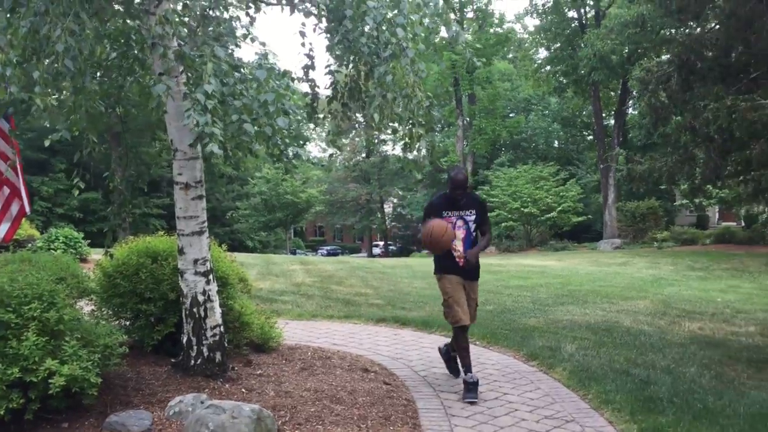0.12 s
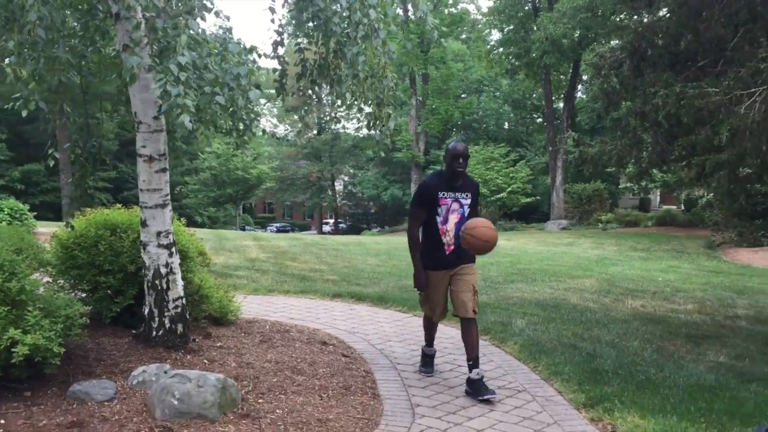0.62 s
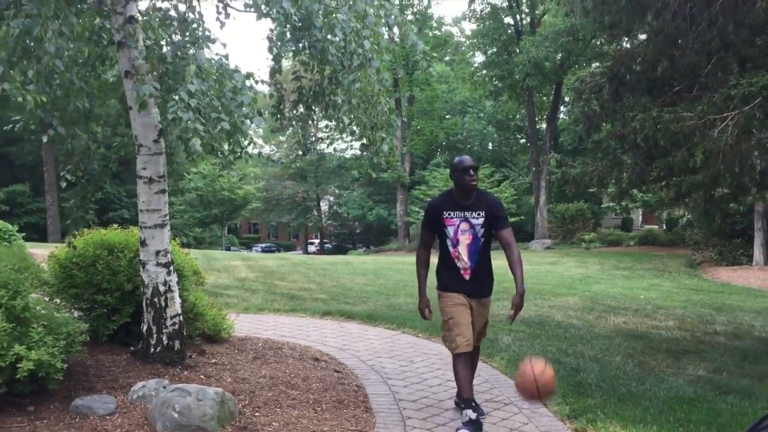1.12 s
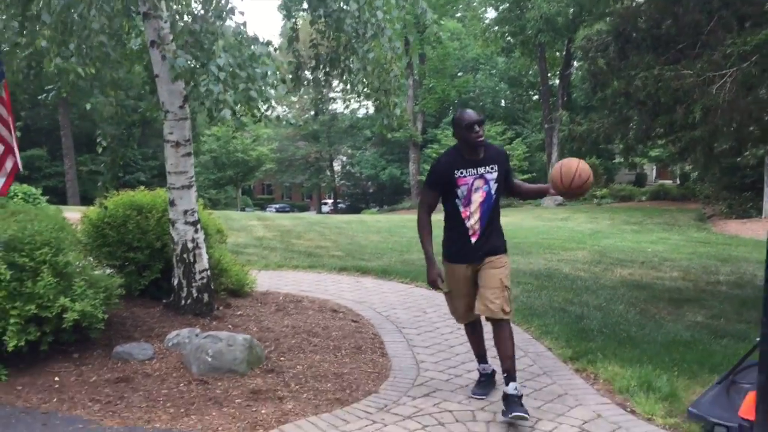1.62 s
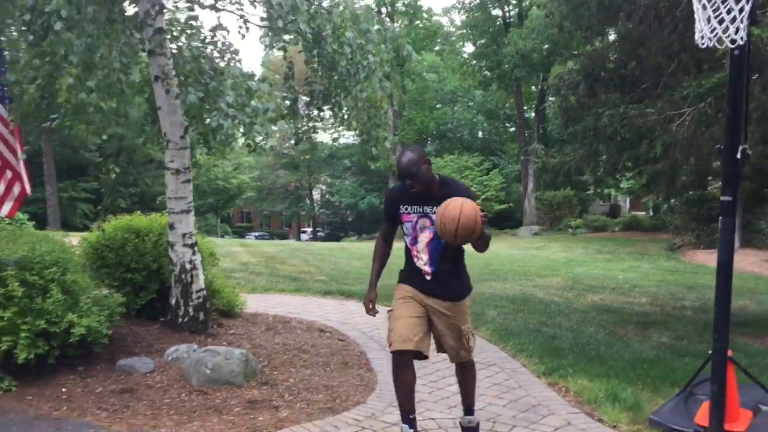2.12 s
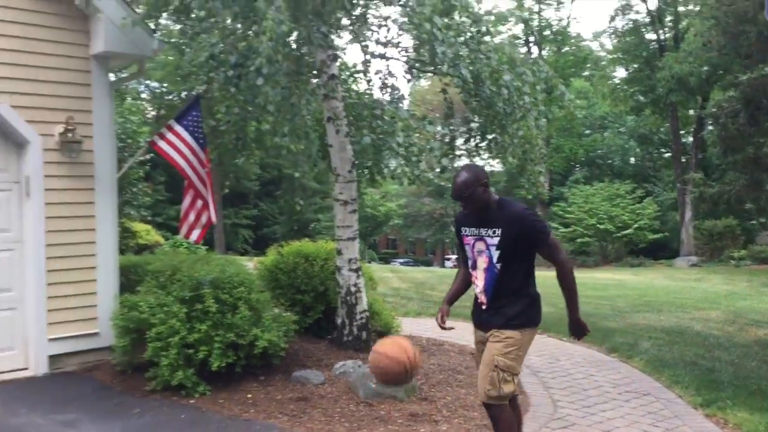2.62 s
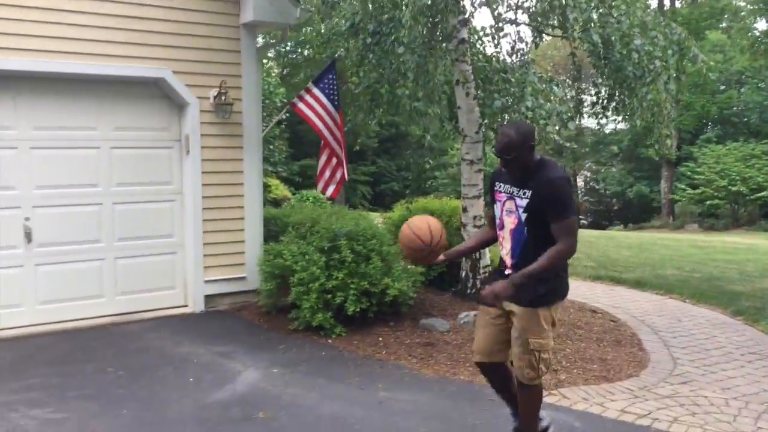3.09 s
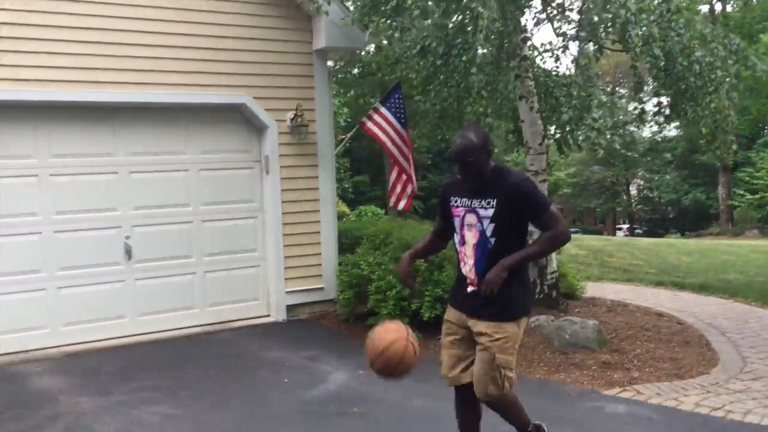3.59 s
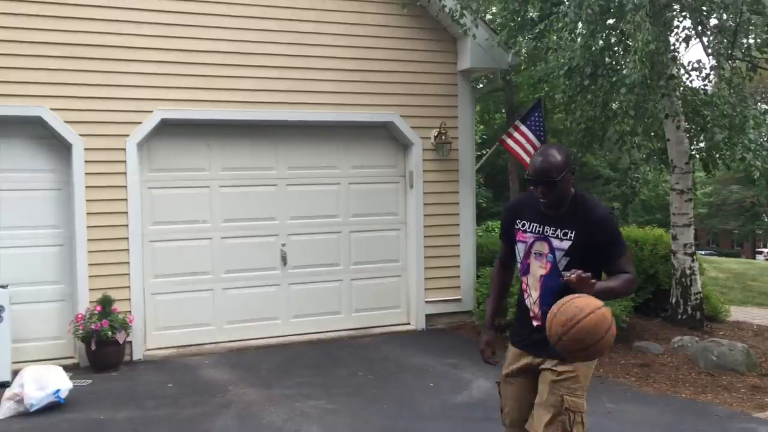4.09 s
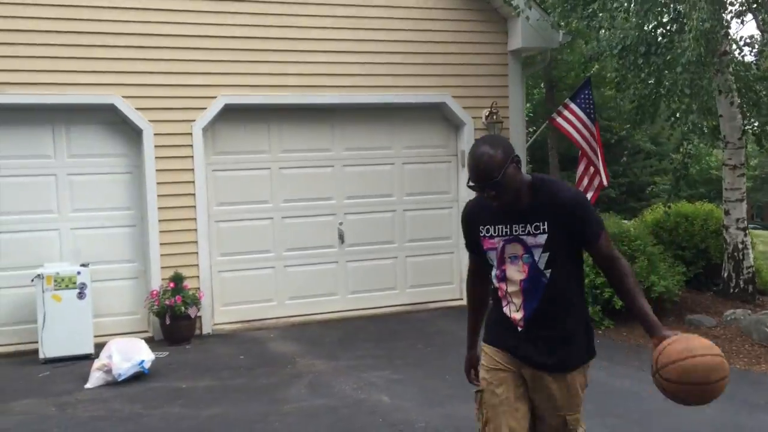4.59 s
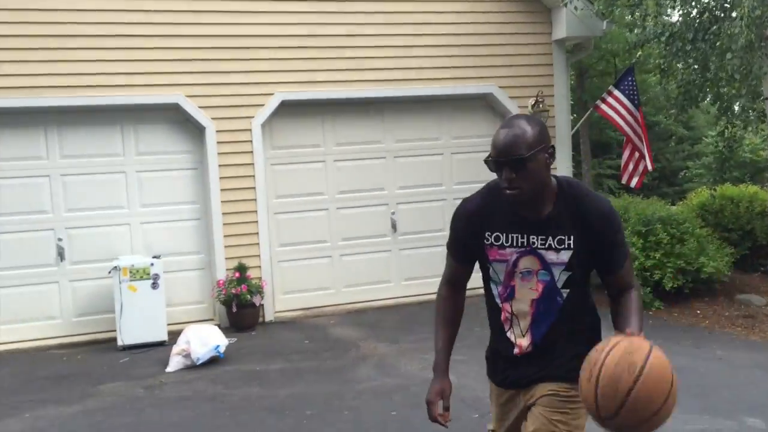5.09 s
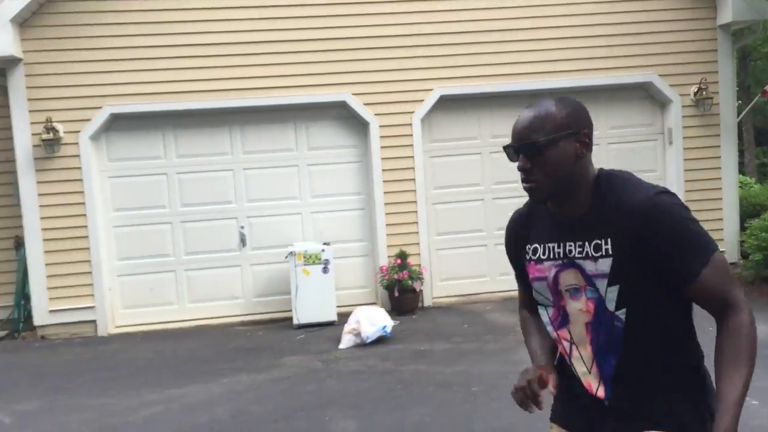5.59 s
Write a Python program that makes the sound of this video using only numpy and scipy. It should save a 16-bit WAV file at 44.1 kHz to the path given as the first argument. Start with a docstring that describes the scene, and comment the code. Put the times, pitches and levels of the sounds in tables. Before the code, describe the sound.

A single bouncing basketball dominates a quiet garden and driveway. Bounces come first on a stone path, then on the drive, the last strongest and brightest, each overloading the phone and followed by a quick slap off the house wall and a brief airy tail. Birds twitter in the gaps, an insect buzzes briefly, and palm taps and footsteps grow busier near the end.

```python
"""A paved path and a driveway beside a house: a basketball is dribbled along, a few metres from a phone it overloads.
Each bounce sums damped shell and air modes with a noise slap; delayed copies come off a step and house walls,
and noise bands die away as the garden's tail. Hands and feet are short knocks, scuffs are bands of noise.
Birds are gliding sines held by the trees; filtered noise makes far traffic and wavering sines the mains hum.
A short insect buzz is made of three noise bands."""
import sys
import numpy as np
from scipy import signal
from scipy.fft import rfft, irfft, next_fast_len
from scipy.io import wavfile
from scipy.ndimage import uniform_filter1d

SR = 44100
rng = np.random.default_rng(int(sys.argv[2]) if len(sys.argv) > 2 else 0)


def convert_level_to_amplitude(level_db):
    """Map a level in decibels to its linear amplitude factor."""
    exponent = np.asarray(level_db, float) / 20
    return 10 ** exponent


def dump_mix(stems):
    """Bounce the given channels to the path in sys.argv[1] as a 16-bit WAV at rate SR."""
    frames = np.atleast_2d(stems).T  # one column per channel
    limited = np.clip(frames, -1, 1)  # hard clip at full scale
    pcm = np.round(limited * 32767).astype(np.int16)
    wavfile.write(sys.argv[1], SR, pcm)


N = 251370  # samples


def noise(size):
    """White noise, spread 1."""
    return rng.standard_normal(size)


def colour(x, points):
    """Filter by (Hz, dB) points on a log frequency axis; 90 dB down outside them."""
    hz, db = np.transpose(points)
    size = next_fast_len(len(x))
    f = np.arange(size // 2 + 1) * SR / size + 1
    gain = convert_level_to_amplitude(np.interp(np.log(f), np.log(hz), db, -90, -90))
    return irfft(rfft(x, size) * gain, size)[:len(x)]


def unit(x):
    """Scale to rms 1."""
    return x / np.sqrt(np.mean(x ** 2))


def band(x, low_hz, high_hz):
    """Causal band-pass."""
    edges = [low_hz, min(high_hz, SR / 2.2)]
    return signal.sosfilt(signal.butter(2, edges, "band", fs=SR, output="sos"), x)


def fade(t, t60_s):
    """Exponential decay, 60 dB down at t60_s."""
    return np.exp(-np.log(1000) * t / t60_s)


def walk(rate_hz, size=N):
    """Slow random wander, rms near 1."""
    k = int(SR / rate_hz)
    steps = np.repeat(noise(size // k + 1), k)
    return unit(uniform_filter1d(uniform_filter1d(steps, k), k)[:size])


def add(out, start_s, x):
    """Mix x in at start_s."""
    i = int(start_s * SR)
    out[i:i + len(x)] += x[:N - i]


def smear(x, tail):
    """Blur x through a noise tail of unit energy, keeping its length."""
    return signal.fftconvolve(x, tail / np.sqrt(np.sum(tail ** 2)))[:len(x)]


def whistle(hz, gain):
    """A sine that follows a moving pitch; gain is its rms."""
    return np.sqrt(2) * gain * np.sin(2 * np.pi * np.cumsum(hz) / SR)


# swells of the far traffic: time_s, rumble_db, hiss_db
TRAFFIC_SWELLS = [(0, -41.5, -49.5), (.3, -45, -50.5), (.6, -40, -49.5), (1.6, -42, -50),
                  (2.13, -44, -49.5), (2.67, -38.5, -50), (2.94, -42.5, -50.5), (3.95, -37, -50),
                  (4.3, -42, -51.5), (4.54, -32.5, -51), (4.7, -40, -49.5), (5.06, -42, -50.5),
                  (5.7, -35.5, -48.5)]
# tone of the low rumble: freq_hz, level_db
RUMBLE_TONE = [(25, -36), (45, -3.5), (70, 3), (105, 1.5), (121, 8), (150, -3.5), (200, -5), (300, -17.5),
               (400, -30)]
# tone of the tyre and leaf hiss: freq_hz, level_db
HISS_TONE = [(250, -0.5), (400, -9), (560, -7.5), (800, -2.5), (1050, -0.5), (1250, -6), (1500, -10),
             (2300, -14.5), (3600, -20), (7000, -27.5), (14000, -36), (16000, -33)]


def traffic():
    """Far traffic: gusty low rumble, and tyre and leaf hiss whose bands drift apart."""
    t = np.arange(N) / SR
    time_s, rumble_db, hiss_db = np.transpose(TRAFFIC_SWELLS)
    gusts_db = np.interp(t, time_s, rumble_db) + 1.8 * walk(9)
    rumble = unit(colour(noise(N), RUMBLE_TONE)) * convert_level_to_amplitude(gusts_db)
    hiss = 0
    for hz in 300 * 2 ** np.arange(0, 6, .5):  # half-octave steps
        drift_db = 1.2 * walk(2.5) + 2.2 * walk(18)
        hiss = hiss + band(noise(N), hz / 1.2, hz * 1.2) * convert_level_to_amplitude(drift_db)
    hiss = colour(hiss, HISS_TONE)
    # the hiss level is set by its middle band
    hiss = hiss / np.std(band(hiss, 580, 2600)) * convert_level_to_amplitude(np.interp(t, time_s, hiss_db))
    return rumble + hiss


# swells of the mains hum: time_s, level_db
HUM_SWELLS = [(0, -54.5), (.7, -56.5), (1.2, -69), (1.5, -45), (2.4, -47), (2.7, -64), (3.2, -49.5),
              (3.9, -50), (4.4, -60), (4.9, -46), (5.35, -43.5), (5.7, -59)]


def mains_hum():
    """Two sines an octave apart, each wavering in pitch and level on its own."""
    hum_hz, low_db = 239.3, -12.5
    high = whistle(hum_hz + .6 * walk(3), convert_level_to_amplitude(1.2 * walk(7)))
    low = whistle(hum_hz / 2 + 1.5 * walk(4), convert_level_to_amplitude(low_db + 3 * walk(5)))
    t = np.arange(N) / SR
    return (high + low) * convert_level_to_amplitude(np.interp(t, *np.transpose(HUM_SWELLS)))


# phrases of the near bird, each a list of glide points before flutter: time_s, pitch_hz, level_db
NEAR_PHRASES = [
    [(1.668, 5680, -76), (1.686, 3428, -54), (1.698, 3180, -50), (1.742, 3991, -49), (1.784, 4860, -49.5),
     (1.788, 4827, -69), (1.806, 5174, -48), (1.826, 5317, -68), (1.832, 4960, -45), (1.843, 3871, -59)],
    [(1.878, 3643, -47), (1.892, 3279, -51), (1.92, 2470, -43.5), (1.938, 2890, -43), (1.942, 2860, -59),
     (1.97, 2194, -59), (2.004, 2450, -49), (2.026, 3470, -41), (2.042, 3605, -36), (2.06, 3583, -80)],
    [(3.137, 3799, -67), (3.153, 2740, -55), (3.167, 2730, -50), (3.177, 3760, -51), (3.181, 3870, -59),
     (3.191, 2820, -50), (3.199, 2798, -55), (3.221, 3495, -44.5), (3.235, 3530, -47), (3.246, 3600, -58)],
    [(3.338, 3768, -64), (3.366, 2750, -44), (3.378, 2370, -58), (3.39, 2230, -53), (3.414, 3197, -44),
     (3.426, 4100, -51), (3.432, 4100, -63), (3.454, 4100, -47), (3.484, 2730, -50), (3.495, 2551, -65)],
]
# short bird notes, before flutter: start_s, length_s, start_hz, end_hz, level_db
SHORT_NOTES = [(.035, .035, 2150, 2280, -54), (0.063, 0.011, 2180, 2600, -45),
               (.26, 0.037, 4300, 4300, -67), (0.303, 0.043, 2330, 2280, -61), (.39, .055, 2480, 2450, -55),
               (.606, .036, 3480, 2700, -54), (.645, .018, 3890, 3570, -51.5),
               (0.657, 0.043, 3230, 2940, -45), (0.727, 0.033, 2346, 3550, -50),
               (0.754, 0.018, 3530, 2800, -49), (.957, 0.029, 3210, 3210, -56),
               (1.13, .04, 2440, 2490, -66), (1.627, .05, 2900, 2860, -62), (1.68, 0.025, 2520, 2460, -60),
               (3.213, 0.032, 2600, 2630, -58), (3.243, 0.023, 4170, 5200, -57),
               (3.263, 0.022, 4240, 4260, -47.5), (3.291, 0.049, 2460, 2370, -57),
               (4.41, 0.044, 2400, 3000, -58), (4.447, 0.035, 2950, 2320, -52),
               (4.431, .022, 4300, 4930, -58), (4.451, .025, 4800, 3200, -51),
               (4.581, .075, 2850, 4350, -47.5), (4.688, 0.084, 2280, 2520, -56.5),
               (5.14, 0.063, 2930, 2870, -58), (5.2, 0.067, 2430, 2590, -50), (5.27, .03, 2140, 2220, -60),
               (5.322, .028, 2170, 2150, -58), (5.62, 0.033, 2750, 2430, -51),
               (5.655, 0.052, 2650, 2940, -53)]


def birds():
    """Gliding whistles with a fluttering level; the trees hold each pitch a moment longer."""
    song, flutter = np.zeros(N), convert_level_to_amplitude(3.3 * walk(90))
    for phrase in NEAR_PHRASES:
        time_s, hz, db = np.transpose(phrase)
        t = np.arange(time_s[0], time_s[-1], 1 / SR)
        edges = np.minimum(t - time_s[0], time_s[-1] - t).clip(0, .004) / .004  # 4 ms fades
        glide_hz = uniform_filter1d(np.interp(t, time_s, hz), size=150)
        add(song, time_s[0], whistle(glide_hz, convert_level_to_amplitude(np.interp(t, time_s, db)) * edges))
    for start_s, length_s, start_hz, end_hz, db in SHORT_NOTES:
        size = int(length_s * SR)
        glide_hz = np.linspace(start_hz, end_hz, size)
        add(song, start_s, whistle(glide_hz, convert_level_to_amplitude(db) * np.sqrt(np.hanning(size))))
    song = song * flutter
    tail_db, tail_t60_s = -3.5, 0.17
    trees = noise(SR // 3) * fade(np.arange(SR // 3) / SR, tail_t60_s)
    return song + convert_level_to_amplitude(tail_db) * smear(song, trees)


def brush(rows):
    """Bands of grainy hiss that start fast and taper."""
    out = np.zeros(N)
    for start_s, length_s, db, low_hz, high_hz in rows:
        size = int(length_s * SR)
        hiss = unit(band(band(noise(size), low_hz, high_hz), low_hz, high_hz))
        shape = np.sqrt(np.sin(np.pi * np.linspace(0, 1, size) ** 0.4).clip(0))
        grain = convert_level_to_amplitude(db + 1.6 * walk(180, size=size))
        add(out, start_s, grain * hiss * shape)
    return out


# soles and cloth brushing: start_s, length_s, level_db, low_hz
SCUFFS = [(.039, .016, -56, 6000), (.054, 0.033, -56, 8000), (.672, .02, -63, 10060),
          (3.19, 0.053, -62, 5000), (4.259, 0.037, -55.5, 5000), (4.778, 0.11, -66, 6000),
          (5.023, 0.07, -54.5, 9000), (5.034, 0.0086, -46, 2980), (5.072, .04, -49, 5400),
          (5.088, 0.06, -53, 5340), (5.563, 0.079, -60.5, 8950), (5.648, .013, -55, 8000)]


def scuffs():
    """Friction of soles and cloth: short brushes of treble noise."""
    top_hz = 15500
    return brush([row + (top_hz,) for row in SCUFFS])


def ring(modes, t, scatter_db, detune):
    """Damped modes that swell while the contact builds; scatter and detune vary them per blow."""
    out = 0
    for hz, db, t60_s, rise_ms, swing in modes:
        a, b = noise(2)
        gain = swing * convert_level_to_amplitude(db + scatter_db * a)
        swell = 1 - np.exp(-1000 * t / rise_ms)
        tone = np.sin(2 * np.pi * hz * (1 + detune * b) * t)
        out = out + gain * swell * fade(t, t60_s) * tone
    return out


# modes of the squashed shell, before pitch ratio and lift-off: freq_hz, level_db, t60_s, rise_ms, first_swing (+-1)
SHELL_MODES = [(91, .7, 1, 5, -1), (211, 21.6, .0147, .81, 1), (228.6, 17.5, .0235, .44, -1),
               (351, -10.5, .1, 4, -1)]


def shell_thump(t, pitch_ratio):
    """The shell's modes, which fall quiet soon after the ball leaves the ground."""
    lift_off_s = .019
    # the lowest mode keeps its pitch; the ratio scales time for the rest
    bass = ring(SHELL_MODES[:1], t, 0, 0) + ring(SHELL_MODES[1:], t * pitch_ratio, 0, 0)
    return bass / (1 + (t / lift_off_s) ** 4)


# modes of the air inside the ball, before scatter: freq_hz, level_db, t60_s, rise_ms, signed swing_factor
AIR_MODES = [(489, -11.5, 0.036, 0.84, -0.73), (677, -3.5, 0.035, 0.45, 0.53),
             (802, -8.5, 0.016, 0.38, 0.96), (956, -7.5, 0.038, 0.29, 1), (1273, -4.5, 0.039, 0.056, -0.28),
             (1460, 11, 0.005, 0.018, -0.72), (2150, 0.5, 0.0088, 0.15, 0.96),
             (2750, -1.5, 0.015, 0.081, -0.7)]


def cavity_ping(t):
    """The enclosed air rings, each blow weighting and tuning its modes a little differently."""
    return ring(AIR_MODES, t, scatter_db=3.8, detune=0.04)


# tone of the rubber slap: freq_hz, level_db
SLAP_TONE = [(1500, 8.5), (3000, 6.5), (4500, -0.5), (6500, -6.5), (9000, -30), (13000, -7), (16000, -30)]


def rubber_slap(t):
    """Rubber meeting the paving: a coloured noise burst that dies in about 10 ms."""
    return convert_level_to_amplitude(-4) * unit(colour(noise(len(t)), SLAP_TONE)) * fade(t, 0.01)


def step_echo(treble, t):
    """A nearby step returns a dull, smeared copy of the treble."""
    step_hz, smear_t60_s = 1100, 0.014
    tail = noise(1500) * fade(t[:1500], smear_t60_s)
    return band(smear(treble, tail), step_hz / 1.7, step_hz * 1.31)


def board_rattle(t):
    """The wall's boards smear the slap into a short rattle of noise."""
    return band(noise(len(t)), 1100, 7900) * fade(t, 0.031)


def wall_echo(bass, treble, rattle):
    """The house wall returns thump and treble, kept bright, plus the rattle of its boards."""
    bright = band(treble, 1800, 8000)
    return convert_level_to_amplitude(-4) * bass + convert_level_to_amplitude(-10.5) * treble + convert_level_to_amplitude(-10.5) * bright + convert_level_to_amplitude(-8.5) * rattle


# diffuse garden tail by band, before tilt: freq_hz, level_db, t60_s
GARDEN_BANDS = [(72.7, -25, 0.54), (142, -28, 0.44), (300, -25.5, 0.24), (613, -17, 0.098),
                (1200, -29, 0.31), (1944, -35, 0.61), (2800, -39, 0.51), (4300, -38.5, 0.38),
                (6860, -46, 0.42), (12000, -47, 0.23)]


def garden_tail(t, slap_db):
    """Scattered trunks and hedges: noise bands with separate decays, made lumpy by level wander."""
    out = 0
    tilt_db = 1.43 + 0.35 * slap_db  # per octave about 1 kHz: it follows the slap
    lumps_db = 1.6 * walk(130, size=len(t))  # shared by all bands
    build = 1 - np.exp(-t / .014)
    for hz, db, t60_s in GARDEN_BANDS:
        tail = unit(band(band(noise(len(t)), hz / 1.46, hz * 1.39), hz / 1.48, hz * 1.39))
        tail = tail * convert_level_to_amplitude(lumps_db + 1.6 * walk(60, size=len(t)))
        gain = convert_level_to_amplitude(db + tilt_db * np.log2(hz / 1000))
        out = out + gain * tail * fade(t, t60_s) * build
    return out


# bounces, each with its own slap level: start_s, blow_db, shell_pitch_ratio, slap_db, cavity_ring_db
BOUNCES = [(.4538, -1.8, 0.99, -3.5, 1), (1.3119, -0.2, 1.025, -5, -3), (2.561, .5, 0.97, -2.5, -2.5),
           (3.8509, 1, 0.94, 0.5, 1.5), (4.4793, 1.5, 1.034, -3.5, 0.5), (5.3993, 3, 0.99, 2, -6)]
# echoes at each landing place: wall_delay_ms, wall_db, far_house_delay_ms, far_house_db, garden_tail_db
LANDING_PLACES = [(22.4, -23, 80, -28.5, -.5), (22.2, -22.5, 100, -36, -3), (22.47, -7.5, 110, -34.5, -1.5),
                  (25.7, -9.5, 60, -28, -0.5), (28.7, -14.5, 51, -33, -1), (35.1, -13.5, 70, -25.5, 0.5)]


def ball():
    """Thump, cavity ping and rubber slap of each bounce, then its echoes and the garden's tail."""
    out, t = np.zeros(N), np.arange(SR // 2) / SR
    step_ms, step_db = 11.5, -8.5
    for bounce, place in zip(BOUNCES, LANDING_PLACES):
        start_s, blow_db, pitch_ratio, slap_db, ring_db = bounce
        wall_ms, wall_db, far_ms, far_db, tail_db = place
        bass = shell_thump(t, pitch_ratio)
        treble = convert_level_to_amplitude(ring_db) * cavity_ping(t) + convert_level_to_amplitude(slap_db) * rubber_slap(t)
        add(out, start_s, convert_level_to_amplitude(blow_db) * (bass + treble))

        dull = step_echo(treble, t)
        add(out, start_s + step_ms / 1000, convert_level_to_amplitude(blow_db + step_db) * dull)

        rattle = board_rattle(t)
        wall = wall_echo(bass, treble, rattle)
        add(out, start_s + wall_ms / 1000, convert_level_to_amplitude(blow_db + wall_db) * wall)
        # the step's copy also comes back off the wall
        add(out, start_s + (wall_ms + step_ms) / 1000, convert_level_to_amplitude(blow_db + wall_db + step_db) * dull)

        far_house = bass + convert_level_to_amplitude(-7) * dull + convert_level_to_amplitude(-15) * rattle
        add(out, start_s + far_ms / 1000, convert_level_to_amplitude(blow_db + far_db) * far_house)
        add(out, start_s, convert_level_to_amplitude(tail_db) * garden_tail(t, slap_db))  # not scaled by the blow
    return out


def knock(hz, t60_s, grit_db):
    """A dull, half-pitched knock: a damped sine, noise around its pitch and some grit."""
    t = np.arange(SR // 6) / SR
    blur = unit(band(noise(len(t)), hz / 3, hz * 1.48))
    body = np.sin(2 * np.pi * hz * t) + 0.62 * blur
    grit = unit(band(noise(len(t)), 420, 2300)) + 0.097 * noise(len(t))
    return (body + convert_level_to_amplitude(grit_db) * grit) * fade(t, t60_s) * (1 - np.exp(-t / 0.0019))


# hands on the ball: start_s, level_db, pitch_hz, grit_db (relative to the knock)
PATS = [(1.044, -28, 570, -31), (1.573, -34, 406, -22), (3.194, -24.5, 324, -13), (3.225, -32, 388, -22),
        (3.409, -37, 300, -17), (3.485, -30.5, 382, -13), (4.263, -26, 520, -5.5), (4.272, -22.5, 373, -8),
        (4.299, -33.5, 390, -6), (4.658, -27.5, 300, -24), (5.035, -39.5, 515, 9), (5.086, -32.5, 484, -25),
        (5.578, -27.5, 410, -11), (5.616, -28, 199.3, -6), (5.680, -23.5, 244, -8)]


def pats():
    """Palms meeting the ball: brief knocks, each with its own pitch and grit."""
    out = np.zeros(N)
    for start_s, db, hz, grit_db in PATS:
        add(out, start_s, convert_level_to_amplitude(db) * knock(hz, t60_s=0.044, grit_db=grit_db))
    return out


# an insect's buzz, a thin top band over a broader rasp: start_s, length_s, level_db, low_hz, high_hz
INSECT_BANDS = [(2.32, 0.19, -62, 10600, 11000), (2.345, 0.12, -57, 8250, 10900),
                (2.385, .07, -62.5, 5000, 8000)]


def insect():
    """A short buzz of overlapping noise bands."""
    return brush(INSECT_BANDS)


# heels landing on stone: start_s, level_db, pitch_hz
FOOTFALLS = [(2.424, -22.5, 83.5), (4.262, -24.5, 74), (4.384, -23, 108), (4.413, -28, 75),
             (4.64, -24.5, 90), (4.719, -29, 99), (4.968, -27.5, 86)]


def footfalls():
    """Heels on stone: low knocks with hardly any grit."""
    out = np.zeros(N)
    for start_s, db, hz in FOOTFALLS:
        add(out, start_s, convert_level_to_amplitude(db) * knock(hz, t60_s=0.086, grit_db=-37))
    return out


def scene():
    """Everything at one microphone."""
    street = traffic() + mains_hum()
    player = scuffs() + pats() + footfalls()
    return (street + birds() + player + ball() + insect())[None]


def band_limit(x):
    """A steep low-pass at the top of the band."""
    return signal.sosfilt(signal.butter(12, 16470, fs=SR, output="sos"), x)


def record(dry):
    """The top is cut above 15.4 kHz, and the converter clips the bounces flat at full scale."""
    low_pass = signal.ellip(8, .2, 60, 15400, fs=SR, output="sos")
    clipped = np.clip(signal.sosfilt(low_pass, dry), -1, 1)
    return band_limit(clipped)


dry = scene()
out = record(dry)
dump_mix(out)
```